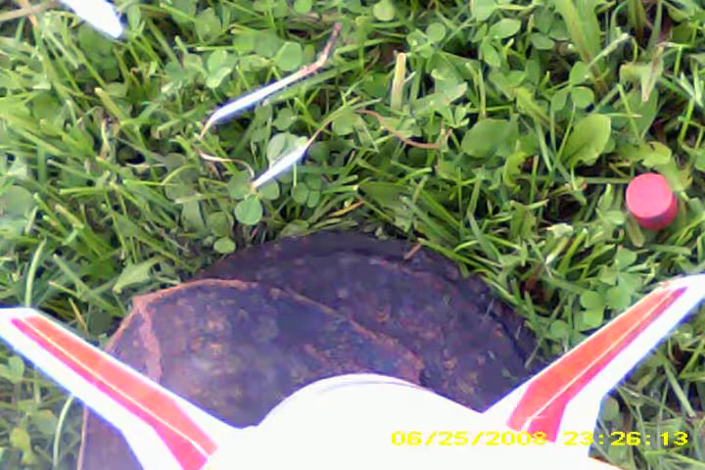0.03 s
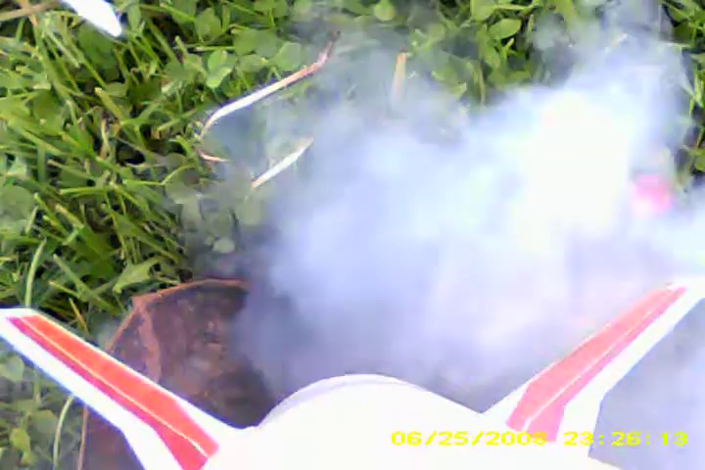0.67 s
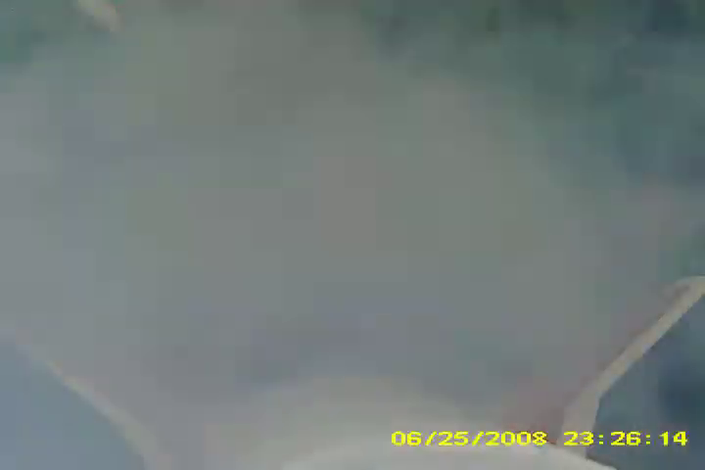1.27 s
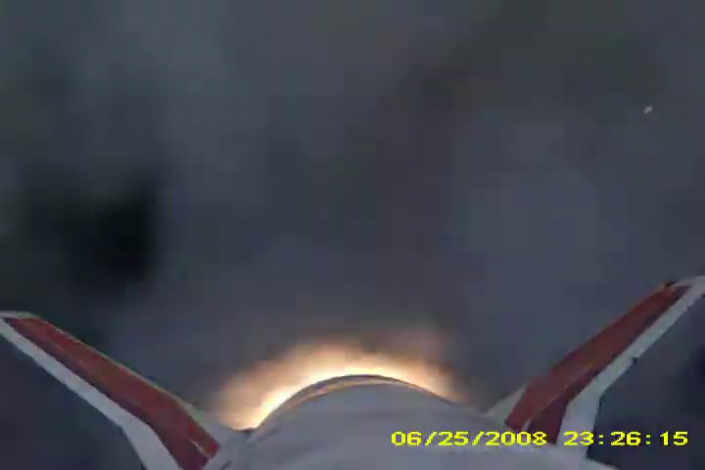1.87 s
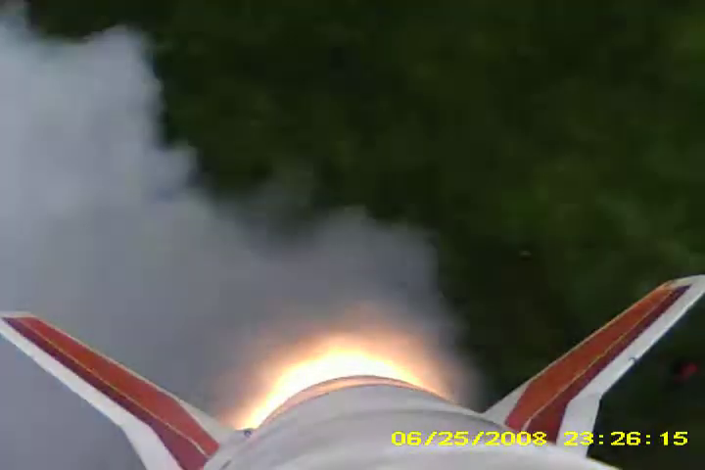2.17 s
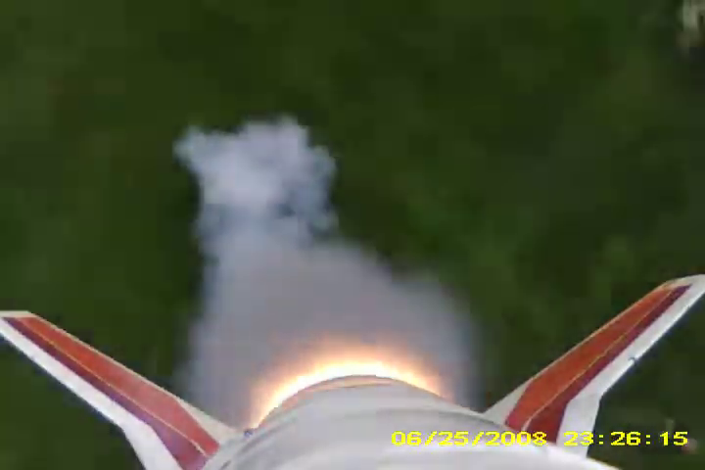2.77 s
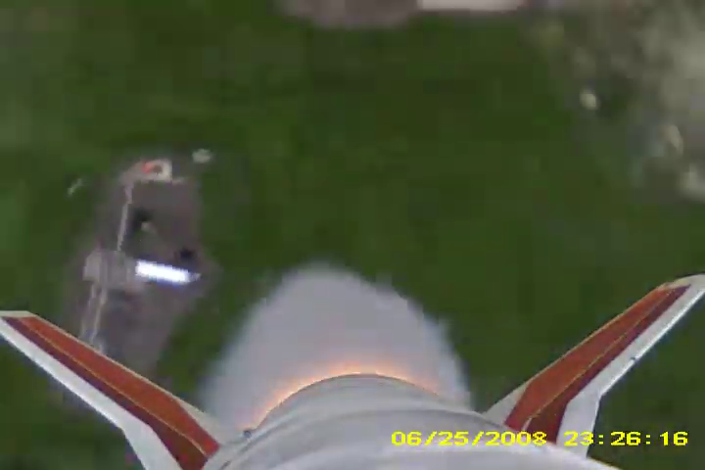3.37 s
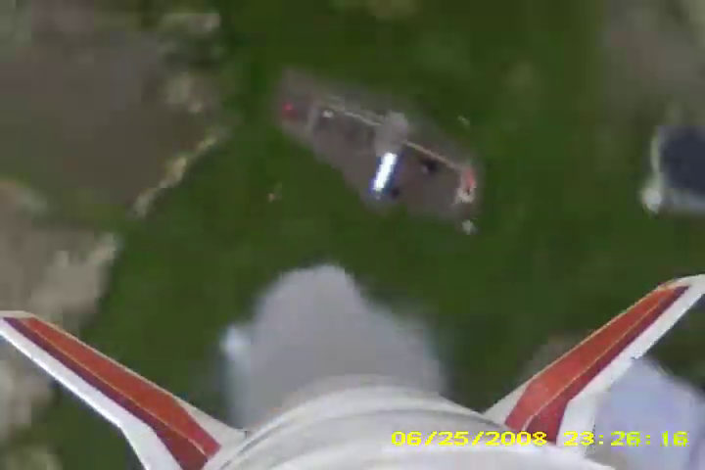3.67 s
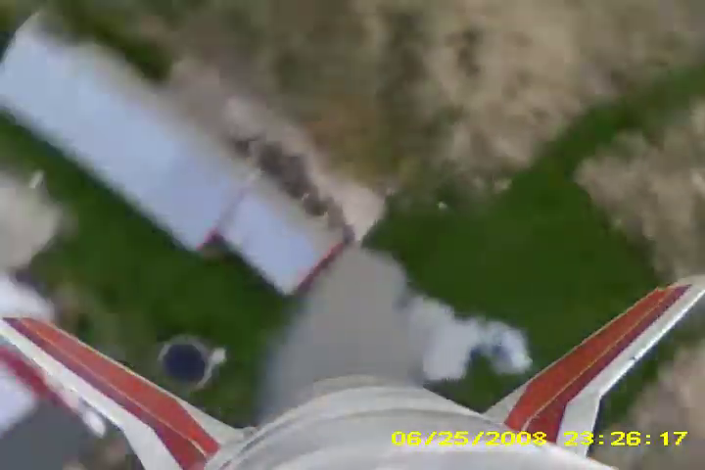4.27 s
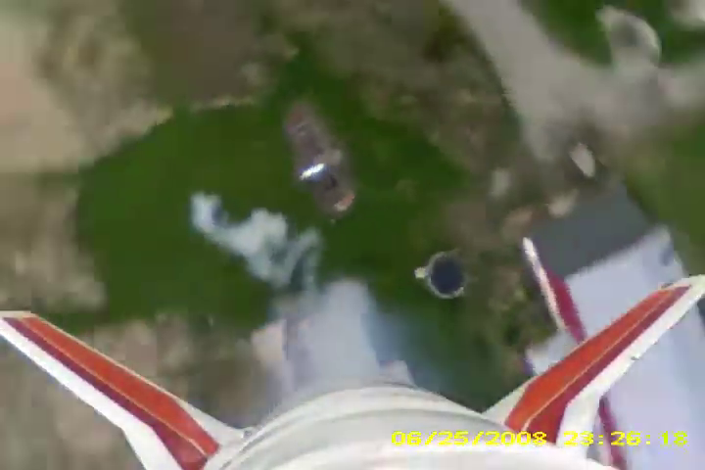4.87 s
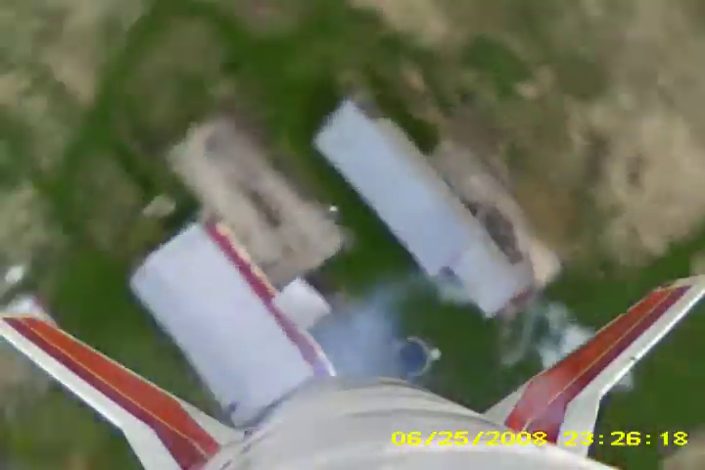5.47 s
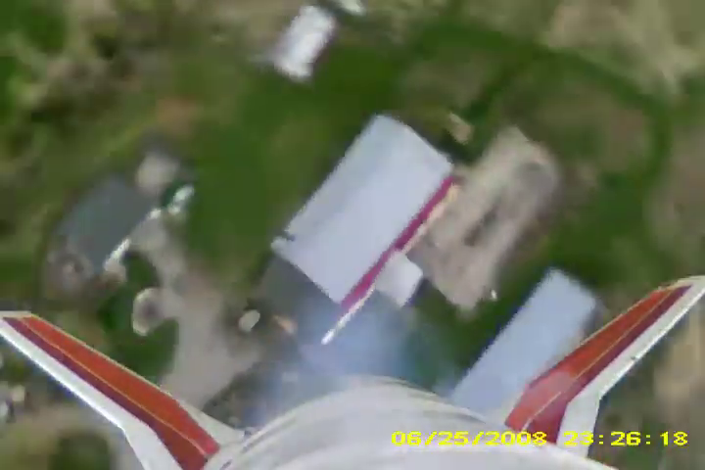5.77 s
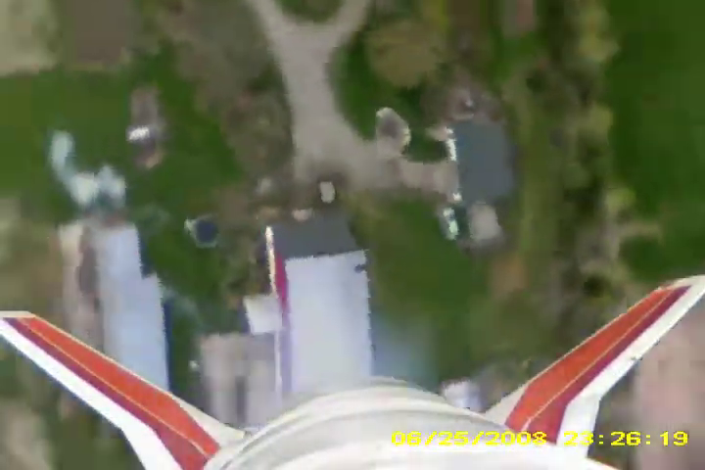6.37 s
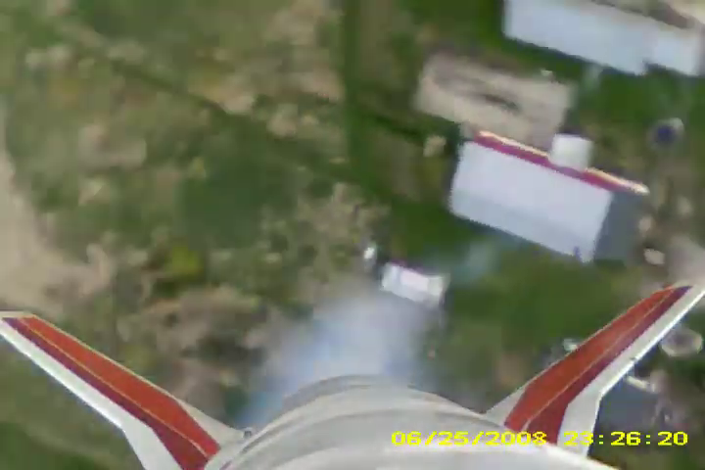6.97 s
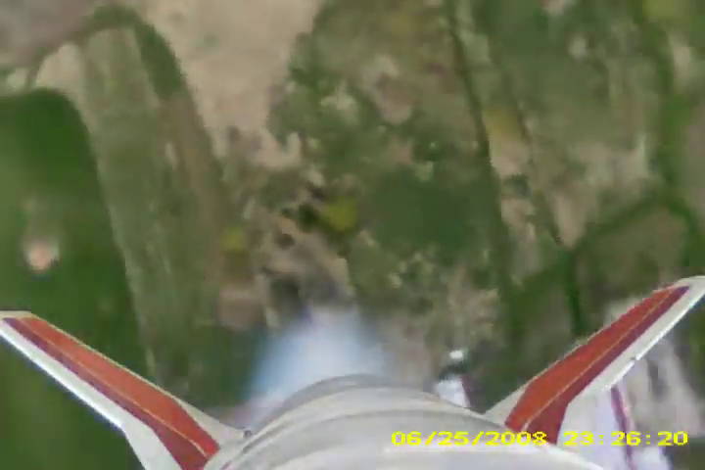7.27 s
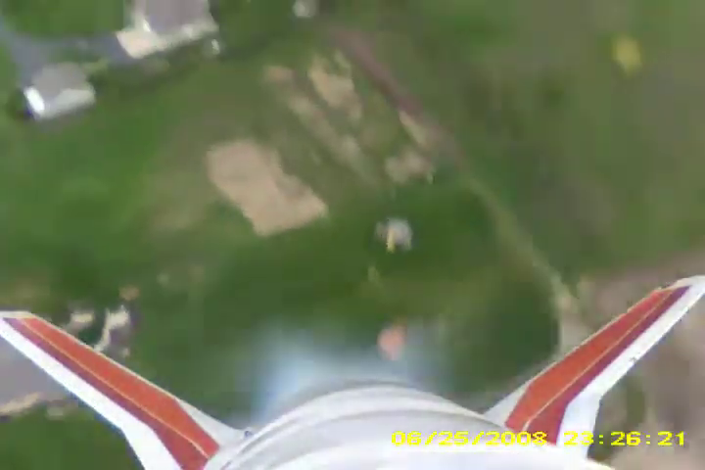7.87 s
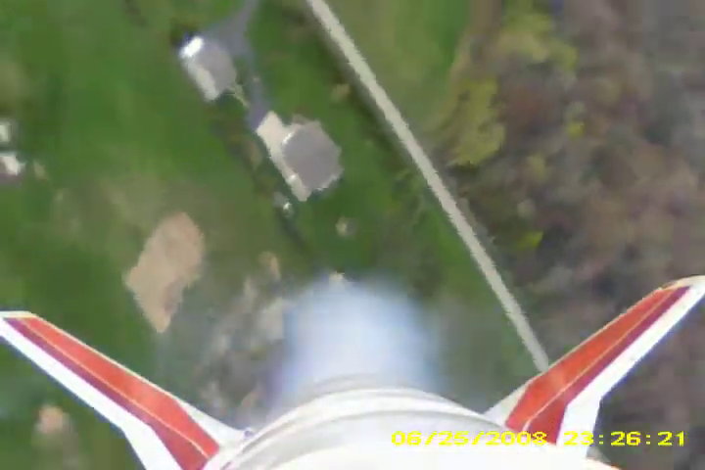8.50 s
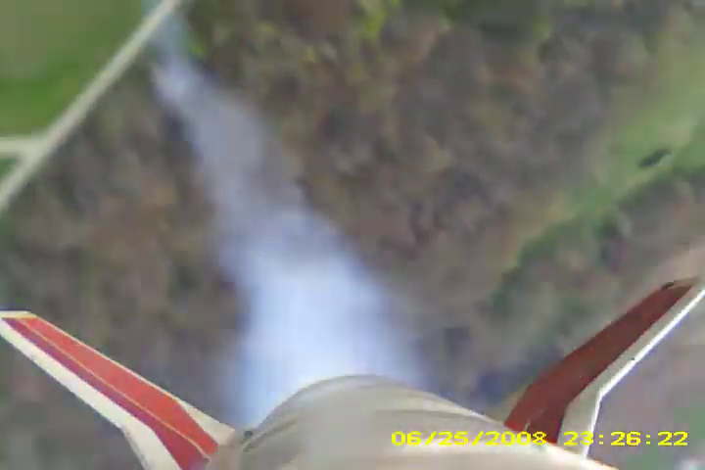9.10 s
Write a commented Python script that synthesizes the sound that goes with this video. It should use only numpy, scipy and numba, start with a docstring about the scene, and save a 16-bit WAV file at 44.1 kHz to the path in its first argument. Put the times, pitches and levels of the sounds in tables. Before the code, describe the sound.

A model rocket launch is heard from a tiny microphone on the rocket's body, sounding boxy and dull. Faint outdoor hiss gives way to an igniter fizz at about 0.5 seconds. The motor chuffs and spits between 0.6 and 0.9 seconds, then nearly dies, with faint ticking sparks. It pops at 1.2 seconds, catches at 1.3, dips briefly, and reaches a loud, hollow roar with hiss and a thin high ring by 1.7. After liftoff at 1.8 seconds, rushing, buffeting air builds with a low howl that rises until about 3.6, overloading the microphone, harshest around 3 seconds. The motor's roar fades beneath the wind. From there the howl sinks and the rush slowly eases while a hollow burning hiss carries on. The wind swells around 6 to 7.5 seconds and again near 8.5, continuing to the end at about 9 seconds.

```python
"""A model rocket launches from grass, heard by a tiny camera taped to its body.
The igniter fizzes; the motor chuffs, spits sparks and nearly dies.
At 1.3 s it catches and roars through the camera case's resonances; liftoff follows at 1.8 s.
Air buffets the case and sheds a howl that rises with speed until 3.6 s, overloading the microphone.
In the coast the howl sinks and the wind eases while the smoke charge burns on."""
import sys
import numpy as np
from scipy import signal
from scipy.fft import rfft, irfft, next_fast_len
from scipy.io import wavfile
from scipy.ndimage import uniform_filter1d
from numba import njit

SR = 44100
rng = np.random.default_rng(int(sys.argv[2]) if len(sys.argv) > 2 else 0)


def waveform_to_disk(signal):
    """Save audio, clipped to [-1, 1], as 16-bit WAV at the path in sys.argv[1]."""
    frames = np.transpose(np.atleast_2d(signal))
    scaled = np.clip(frames, -1, 1) * 32767
    samples = np.round(scaled).astype(np.int16)
    wavfile.write(sys.argv[1], SR, samples)


N = 407484
T = np.arange(N) / SR
TOP_SPEED_M_S = 65.9

# Burn stages: fizz, flare, false start, spit, smoulder, bark, pad hiss, full thrust, smoke charge.
# Each row: start, full, end and decay in seconds, then roar, hiss, rumble and port ring in dB.
BURN_STAGES = [ (0.0, .58, .65, .02, -31.5, -37, -45, -27.5),
               (0.58, 0.65, 0.82, 0.013, -22, -28, -41, -16.5),
               (0.7, .822, .921, .0105, -16.5, -26, -29, -7.5),
               (0.8, .897, .916, .006, -22, -19.5, -16, -20), (0.88, .94, 1.6, .02, -54, -65, -52, -34.5),
               (1.14, 1.34, 1.463, 0.039, -15.5, -29, -42, -10.5),
               (1.23, 1.356, 1.63, 0.021, -16, -18.5, -19, -19),
               (1.47, 1.67, 2.67, 0.57, -8, -20.5, -18, -9), (2.4, 5.5, 9.3, .5, -8.5, -50, -44, -14.5)]
# Gas slugs from the nozzle. Each row: peak time and sigma in seconds, crack and thump in dB, thump in Hz.
CHUFFS = [(0.648, 0.003, -22, -41, 500), (0.719, 0.008, -12, -24, 600), (0.942, 0.022, -36, -35, 450),
          (1.065, .003, -39, -38, 450), (1.117, .003, -44, -36, 350), (1.158, 0.017, -29, -41, 400),
          (1.196, 0.012, -19, -20.5, 575), (1.208, 0.0078, -39, -19, 200), (1.702, 0.017, -18, -12.5, 660)]
# Broad swells of mid-pitched wind noise rise and fade during the flight.
# Each row: peak time and sigma in seconds, centre and width in Hz, level in dB.
SWELLS = [(2.852, 0.47, 1337, 402, -6), (2.947, 0.15, 944, 247, -5.5), (6.15, 0.26, 408, 130, -16),
          (6.6, 0.88, 1576, 398, -11.5), (7.6, 0.36, 806, 605, -15), (8.554, 0.16, 750, 350, -8.5),
          (8.6, 0.48, 1660, 490, -14.5)]
# Spectra at the microphone. Each row: frequency in Hz, relative level in dB.
CASE_SPECTRUM = [(40, -14), (400, -13.5), (780, -5.5), (1000, -3.5), (1330, -2.5), (1550, -2), (1750, -3),
                 (1980, -8.5), (2220, -7), (2480, -17), (2780, -22), (3150, -29), (4300, -26), (5200, -47),
                 (9000, -59)]  # outside sound through the case's cavities
HISS_SPECTRUM = [(500, -27), (1500, -12.5), (2300, 8), (2750, 3), (3200, 8.5), (4100, 9), (5200, 0),
                 (5900, 1.5), (6400, 0), (7000, -1.5), (7700, -1), (8800, -3.5), (9600, -2), (10300, -5),
                 (12000, -10.5)]
RUMBLE_SPECTRUM = [(20, 6), (80, 4.5), (170, 7.5), (300, 9), (550, 6.5), (850, -1), (1300, -37),
                   (2500, -36), (6000, -55)]
RUSH_SPECTRUM = [(20, -22), (120, -7), (300, -1.5), (450, -0.5), (850, -2), (1150, -3), (1550, -3),
                 (2050, -6.5), (2400, -11.5), (3000, -16.5), (4000, -20.5), (5200, -25), (10000, -43)]
FIELD_SPECTRUM = [(40, -16), (400, -16), (750, -18), (980, -2), (1270, 4), (1550, -6), (1800, 0), (2020, 2),
                  (2400, -19), (2750, -29), (3200, -14), (4400, -17), (5200, -27), (9000, -41)]  # quiet field through the case


def motor(speed_m_s, port_hz=1910, port_width_hz=260, sputter_db=0.63):
    """Uneven burning shakes roar, hiss and rumble together; the microphone port rings hollow."""
    power = sum(np.outer(undb(row[4:]), chamber_pressure(*row[:4])) ** 2 for row in BURN_STAGES)
    roar_gain, hiss_gain, rumble_gain, ring_gain = np.sqrt(power)
    slipstream = (speed_m_s / TOP_SPEED_M_S) ** 2  # carries the sound away
    ring = band(colour(noise(), CASE_SPECTRUM), port_hz, port_width_hz)
    ring *= ring_gain * undb(-4 * slipstream)
    roar = colour(noise(), CASE_SPECTRUM) * roar_gain * undb(-6 * slipstream)
    hiss = colour(noise(), HISS_SPECTRUM) * hiss_gain
    rumble = colour(noise(), RUMBLE_SPECTRUM) * rumble_gain
    return (roar + ring + hiss + rumble) * undb(sputter_db * wander(rate_hz=70))


def chamber_pressure(start_s, full_s, end_s, decay_s):
    """Pressure, 0-1: builds ever faster, holds, dies away."""
    build = np.clip((T - start_s) / (full_s - start_s), 0, 1) ** 2.83
    return build * np.exp(-np.maximum(T - end_s, 0) / decay_s)


def airflow(speed_m_s, shedding_hz_per_m_s=5.26, gust_db=0.4):
    """Shed vortices howl; large eddies buffet the case, small ones rush and hiss over the port."""
    shedding_hz = np.maximum(shedding_hz_per_m_s * speed_m_s, 20)
    wake, _ = svf(noise(), shedding_hz, damping=0.35)
    wake, _ = svf(wake, shedding_hz, damping=1.0)
    howl = undb(-1) * unit(wake / np.sqrt(shedding_hz))
    _, turbulence = svf(noise(), shedding_hz, damping=0.89)
    eddies = undb(-2) * unit(resonate(turbulence, hz=100, width_hz=280) / np.sqrt(shedding_hz))
    buffet = wind_gain(speed_m_s, full_db=-4, knee_m_s=40.9, power=2.22) * (howl + eddies)
    rush = colour(noise(), RUSH_SPECTRUM) * wind_gain(speed_m_s, full_db=-3.5, knee_m_s=20.8, power=1.44)
    hiss = colour(noise(), HISS_SPECTRUM) * wind_gain(speed_m_s, full_db=-18.5, knee_m_s=30.8, power=2.7)
    air = noise()
    swells = sum(undb(db) * puff(air, *shape) for *shape, db in SWELLS)
    return (buffet + swells + rush + hiss) * undb(gust_db * wander(rate_hz=9))


def airspeed(liftoff_s=1.764, boost_s=1.87, coast_decay_s=4):
    """Speed in m/s: thrust eases it up to the top; drag and gravity then bleed it off."""
    boost = np.clip((T - liftoff_s) / boost_s, 0, 1)
    coast_s = np.maximum(T - liftoff_s - boost_s, 0)
    return TOP_SPEED_M_S * np.sin(np.pi / 2 * boost) ** 2 * np.exp(-coast_s / coast_decay_s)


def wind_gain(speed_m_s, full_db, knee_m_s, power):
    """Wind noise grows as a power of airspeed and levels off above the knee."""
    growth = (speed_m_s / knee_m_s) ** power
    return undb(full_db) * growth / np.hypot(1, growth)


def chuffs(crack_hz=1400, crack_width_hz=1500):
    """Each slug of gas makes a brief rasping crack over a low thump."""
    rasp = colour(noise(), CASE_SPECTRUM)
    gas = colour(noise(), RUMBLE_SPECTRUM)
    out = np.zeros(N)
    for peak_s, sigma_s, crack_db, thump_db, thump_hz in CHUFFS:
        out += undb(crack_db) * puff(rasp, peak_s, sigma_s, crack_hz, crack_width_hz)
        out += undb(thump_db) * puff(gas, peak_s, sigma_s, thump_hz, width_hz=thump_hz)
    return out


def jet_ring(start_s=1.32, rise_s=0.03, fade_s=5.9, hz=4060, width_hz=480, level_db=-21):
    """The jet rings a high cavity note that fades as the pad falls away."""
    age_s = np.maximum(T - start_s, 0)
    ring = band(noise(), hz, width_hz, skirt_ratio=3)
    return undb(level_db) * ring * (1 - np.exp(-age_s / rise_s)) * np.exp(-age_s / fade_s)


def sparks(start_s=1.0, fade_s=0.3, rate_per_s=200, level_db=-49):
    """Sparks from the false start tick against the case, ever fainter."""
    hits = (rng.random(N) < rate_per_s / SR) * noise()
    ticks = colour(hits, CASE_SPECTRUM) + undb(-17) * colour(hits, HISS_SPECTRUM)
    fade = (T > start_s) * np.exp(-np.maximum(T - start_s, 0) / fade_s)
    return undb(level_db) * ticks * fade


def background(whine_hz=7360):
    """The quiet field through the case, plus the camera's faint whine, rumble and hiss."""
    whine = undb(-66) * np.sqrt(2) * np.sin(2 * np.pi * whine_hz * T)
    rumble = undb(-57) * unit(resonate(noise(), hz=85, width_hz=60))
    field = undb(-48) * colour(noise(), FIELD_SPECTRUM)
    hiss = undb(-66) * colour(noise(), HISS_SPECTRUM)
    return whine + rumble + field + hiss


def undb(db):
    """Decibels to gain."""
    return 10 ** (np.asarray(db) / 20)


def unit(x):
    """Scale to rms 1."""
    return x / np.std(x)


def noise():
    """White noise, rms 1."""
    return rng.standard_normal(N)


def wander(rate_hz):
    """Random steps, smoothed twice; rms 1."""
    hold = int(SR / rate_hz)
    steps = np.repeat(rng.standard_normal(N // hold + 1), hold)[:N]
    return unit(uniform_filter1d(uniform_filter1d(steps, hold), hold))


def colour(x, spectrum):
    """Shape x by a spectrum table; rms 1."""
    hz, db = np.transpose(spectrum)
    bin_hz = np.maximum(np.arange(N // 2 + 1) * SR / N, 1)
    gain = undb(np.interp(np.log(bin_hz), np.log(hz), db))
    return unit(irfft(rfft(x) * gain, N))


@njit
def svf(x, hz, damping):
    """State-variable filter with a moving centre; returns band-pass and low-pass."""
    bandpass, lowpass = np.empty(len(x)), np.empty(len(x))
    band_state, low_state = 0., 0.
    for i in range(len(x)):
        g = np.tan(np.pi * hz[i] / SR)
        v = (band_state + g * (x[i] - low_state)) / (1 + g * (g + damping))
        bandpass[i], lowpass[i] = damping * v, low_state + g * v
        band_state, low_state = 2 * v - band_state, low_state + 2 * g * v
    return bandpass, lowpass


def resonate(x, hz, width_hz):
    """One resonance, gain 1 at its centre."""
    return svf(x, np.full(N, float(hz)), width_hz / hz)[0]


def band(x, hz, width_hz, skirt_ratio=2):
    """Two resonances in series, the second wider; rms 1."""
    return unit(resonate(resonate(x, hz, width_hz), hz, skirt_ratio * width_hz))


def puff(x, peak_s, sigma_s, hz, width_hz):
    """A band of x under a Gaussian envelope."""
    return np.exp(-0.5 * ((T - peak_s) / sigma_s) ** 2) * band(x, hz, width_hz)


def limiter(x, knee=1.88, smooth_hz=2500):
    """Gain follows the envelope within a millisecond and squeezes the roar."""
    pole = np.exp(-2 * np.pi * smooth_hz / SR)
    envelope = np.abs(signal.hilbert(x, next_fast_len(N))[:, :N])
    envelope = signal.filtfilt([1 - pole], [1, -pole], envelope)
    return x / (1 + np.abs(envelope) ** knee) ** (1 / knee)


def scene():
    """Motor and air meet at one microphone."""
    speed_m_s = airspeed()
    return (motor(speed_m_s) + jet_ring() + chuffs() + sparks() + airflow(speed_m_s) + background())[None]


def record(dry, ceiling=0.71, soften_hz=5200, cutoff_hz=11200):
    """The overloaded input flattens peaks that pass the limiter; the camera dulls and cuts the treble."""
    limited = limiter(dry)
    clipped = limited / (1 + (limited / ceiling) ** 8) ** (1 / 8)
    pole = np.exp(-2 * np.pi * soften_hz / SR)
    dulled = signal.lfilter([1 - pole], [1, -pole], clipped)
    return signal.sosfilt(signal.butter(16, cutoff_hz, fs=SR, output="sos"), dulled)


dry = scene()
out = record(dry)
waveform_to_disk(out)
```